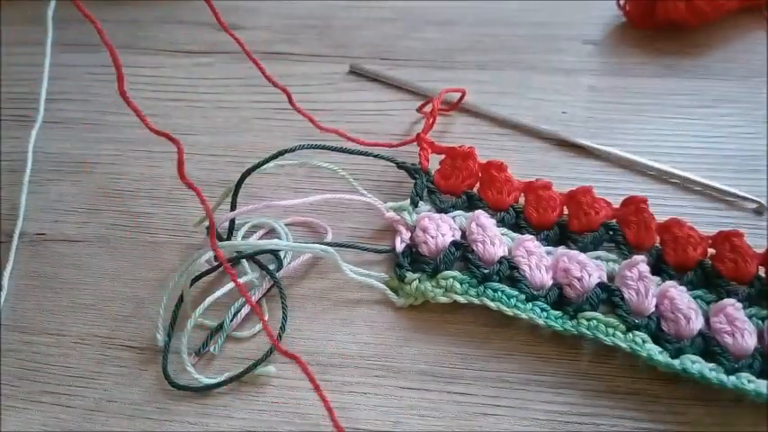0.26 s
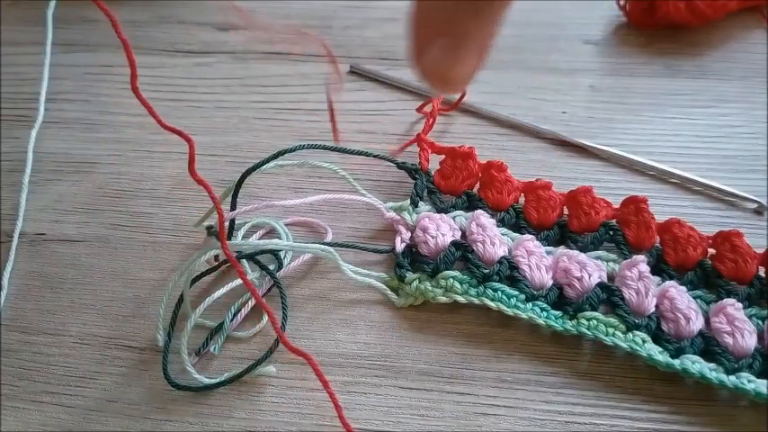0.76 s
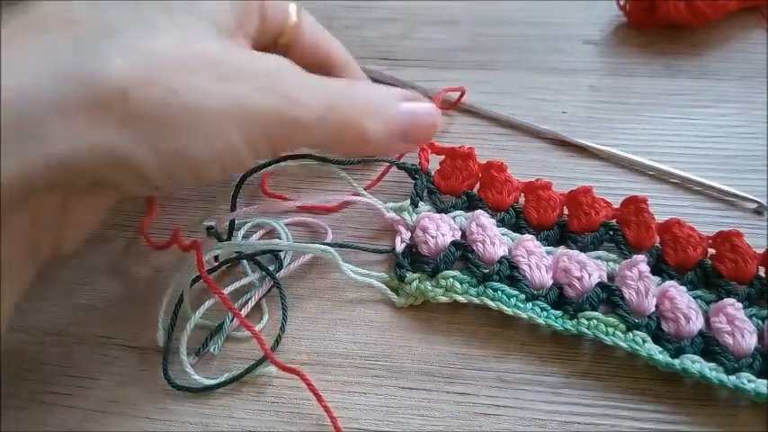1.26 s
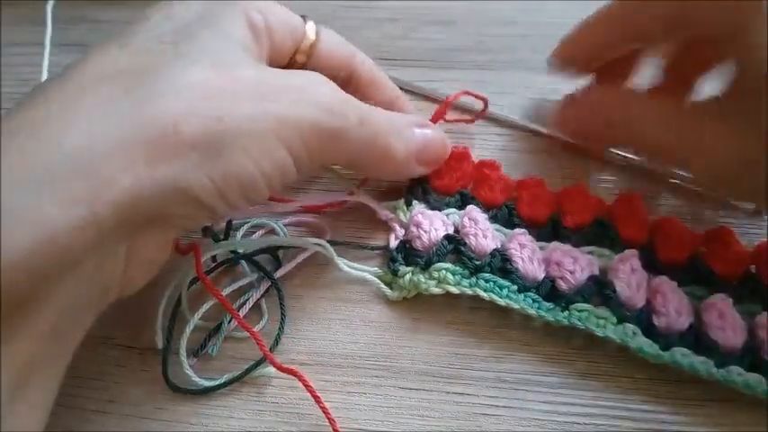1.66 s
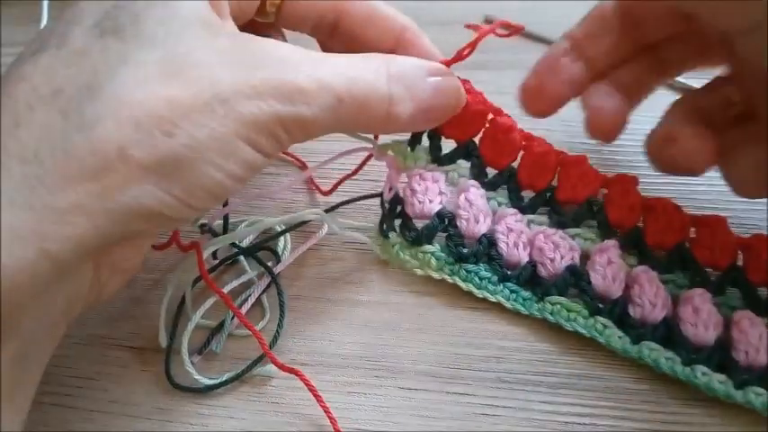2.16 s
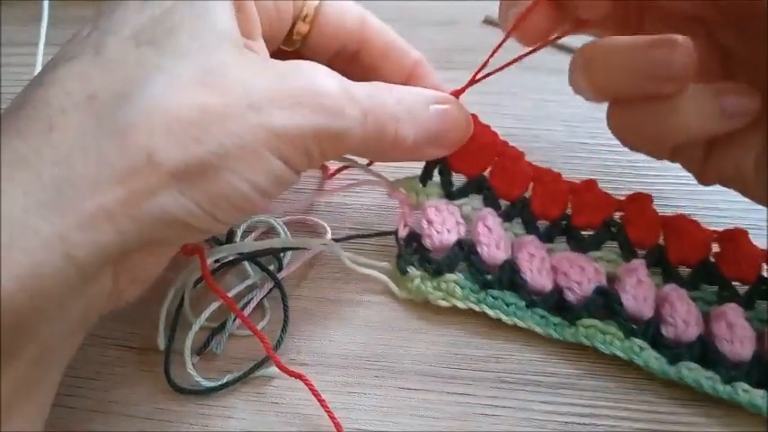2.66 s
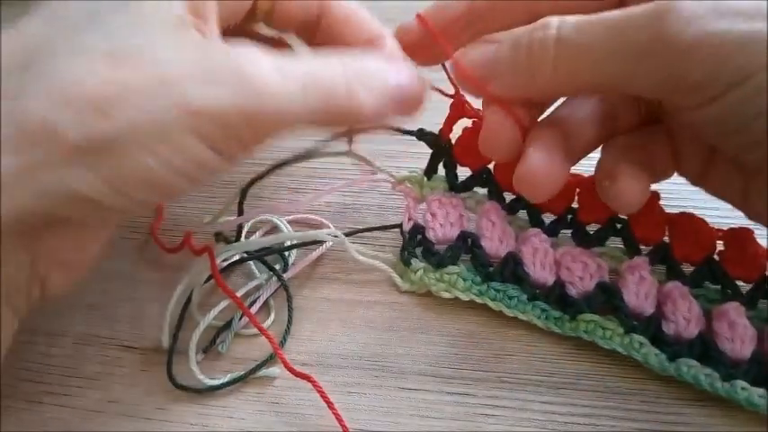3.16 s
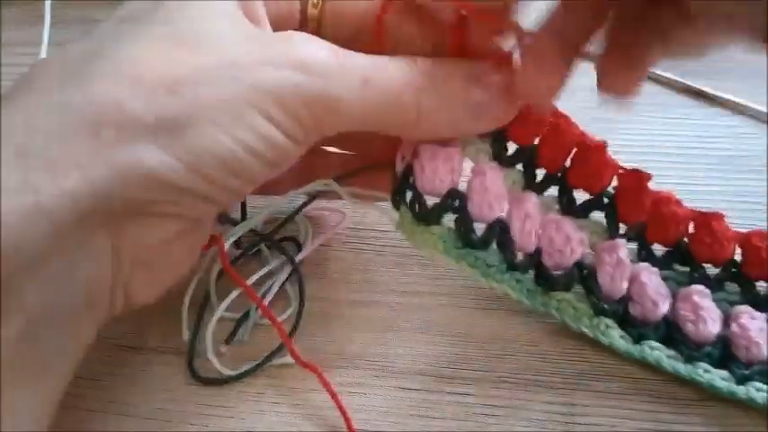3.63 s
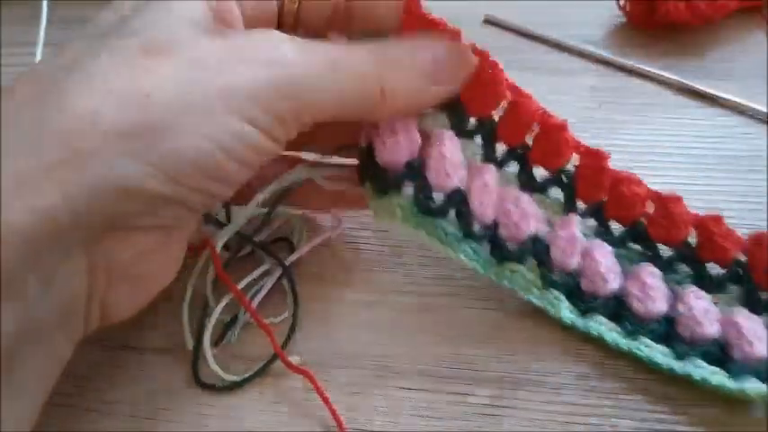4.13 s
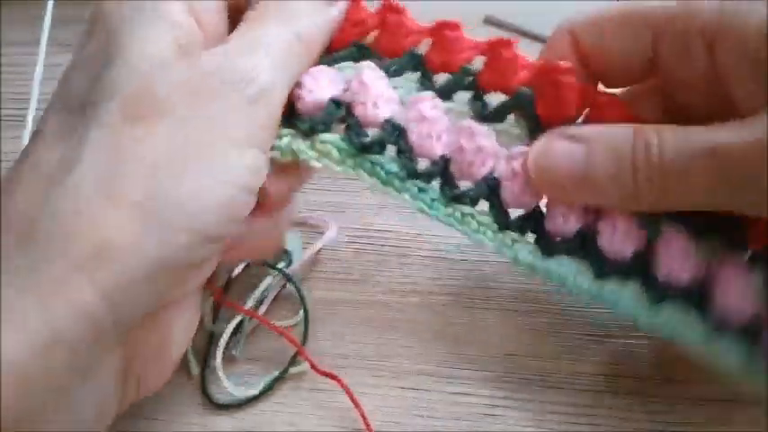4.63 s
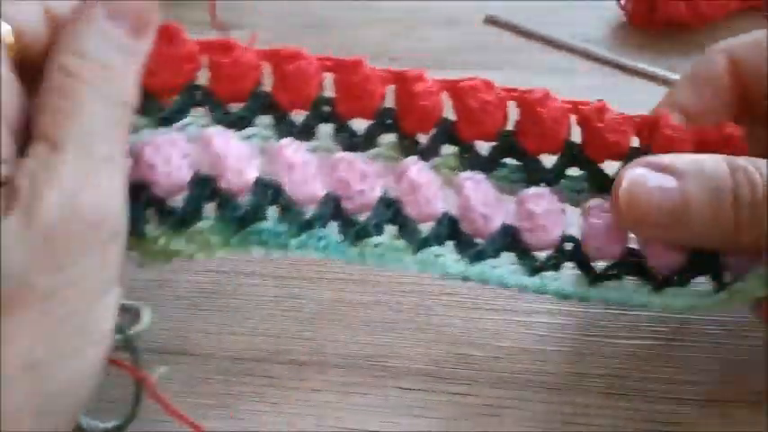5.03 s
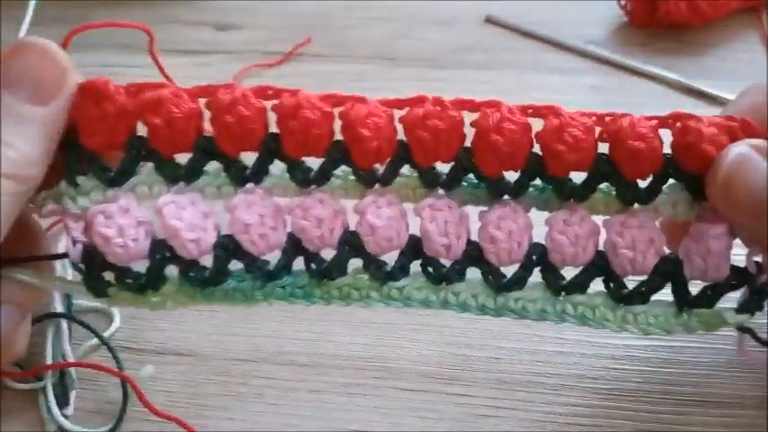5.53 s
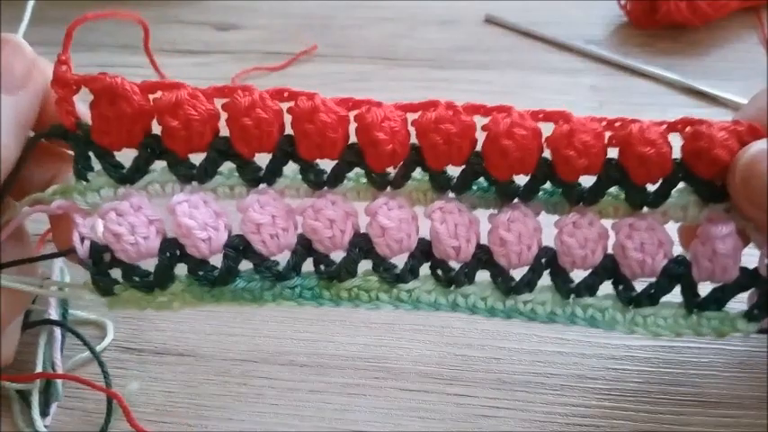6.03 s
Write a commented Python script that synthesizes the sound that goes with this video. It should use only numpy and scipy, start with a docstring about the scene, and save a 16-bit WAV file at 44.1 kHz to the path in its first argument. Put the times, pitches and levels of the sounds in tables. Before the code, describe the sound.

Close stereo phone microphones on handiwork at a wooden table, with faint room tone. Light metal scraping and small knocks, a thin blade squeak, then a crisp dry snip. Scissors land hard on the wood, ringing brightly and rattling to rest; a slender hook slides away with a high hiss. The rest is very quiet: fibres rustling, hands and knitted cotton brushing the tabletop, one dull bump near the end.

```python
"""Crochet work on a wooden table in a small quiet room, close to a phone with two microphone ports.
Over faint room tone, steel scissors are dragged off the table, open with a thin squeak and snip a thread.
After a first faint rustle of yarn they are dropped: a clank and a few quickening bounces.
A metal hook scrapes and sings as it is picked up; yarn then rustles softly through the fingers,
the crocheted strip drags over the wood, hands brush the table and one of them bumps it."""
import sys
import numpy as np
from scipy import signal
from scipy.fft import rfft, irfft
from scipy.io import wavfile

SR = 44100
rng = np.random.default_rng(int(sys.argv[2]) if len(sys.argv) > 2 else 0)


def transcribe(u):
    """Save the signal u as a 16-bit wav file named by the first command-line argument.

    u: samples, shape (n,) or (channels, n), limited to [-1, 1]; the rate is SR.
    q: integer samples, one column per channel.
    """
    v = np.clip(np.atleast_2d(u).T, -1, 1)
    q = np.round(v * 32767).astype(np.int16)
    wavfile.write(sys.argv[1], SR, q)


N = 277168
TIME = np.arange(N) / SR  # s
RING_TIME = TIME[:SR * 3 // 4]  # s, the span of every ring and echo

# All levels are relative. Spectra list [f/Hz, density/dB per Hz]; L-R/dB is left minus right port.
# Faint tone of the room: spectrum
ROOM_SPECTRUM = [(20, 0.5), (30, -13.5), (45, -11), (120, -20.5), (200, -17.5), (320, -21.5), (540, -26.5),
                 (1000, -31), (2700, -37.5), (5200, -44), (11000, -42.5), (15000, -44.5)]
ROOM_DB = -65.5
# Metal sliding on wood, first the scissors, then the hook:
# [middle t/s, length/s, scrape level/dB, hiss level/dB, low rumble level/dB, resonance of the spot f/Hz]
SLIDES = [(0.01, 0.13, -70, -58, -60.5, 1950), (0.07, 0.13, -66, -57, -70, 1120),
          (0.153, 0.15, -60, -50.5, -65.5, 1960), (1.536, 0.1, -60.5, -53.5, -64, 2100),
          (1.602, 0.07, -64, -49, -60, 2070), (1.682, 0.16, -47, -60, -51, 2210),
          (1.808, 0.17, -59.5, -61, -64, 1400), (2.028, 0.13, -51, -44.5, -70, 2290),
          (2.114, 0.092, -53.5, -48, -72, 1050), (2.161, 0.13, -57, -49, -71, 1430),
          (2.224, 0.24, -55, -44.5, -77, 2060)]
# Scrape of metal, also brushing cotton, on wood: spectrum
SCRAPE_SPECTRUM = [(150, -15.5), (380, -7.5), (730, -13.5), (950, -4.5), (1400, -5.5), (1750, -8.5),
                   (2050, -6), (2800, -9), (4000, -13), (5500, -27), (10000, -28.5), (15000, -41.5)]
# Hiss of metal over the fine grain: spectrum
HISS_SPECTRUM = [(1500, -19), (3000, -0.5), (4500, -2.5), (6200, -3.5), (8000, -2.5), (9500, 0), (10800, 0),
                 (11600, -17), (13000, -18.5), (15000, -23.5)]
# A stroke's speed follows one arch; its gain is speed to this power
SPEED_POWER = 1.74
# Blows on the table top:
# [t/s, wooden knock level/dB, low boom level/dB, hollow thud level/dB, contact tick level/dB]
KNOCKS = [(0.071, -32, -47, -40, -38), (0.118, -30, -30, -35.5, -37), (0.131, -30, -38, -33, -43),
          (0.147, -24.5, -33, -31.5, -34), (0.162, -28, -26.5, -52, -37), (0.173, -32, -37.5, -25, -35),
          (0.191, -35, -31, -34, -40), (1.4968, -19, -30, -25.5, -37), (1.533, -38, -46, -31, -43),
          (1.5925, -16, -19, -19, -22.5), (1.6243, -16, -30, -34, -42), (1.6405, -7.5, -15.5, -35, -11),
          (1.7003, -8, -14, -22, -24), (1.7432, -11, -45, -25, -26), (1.7745, -16.5, -37, -25, -34),
          (1.798, -28, -34, -25.5, -46), (1.8345, -34.5, -29, -31, -57), (1.860, -42, -44, -32.5, -55),
          (1.9595, -35.5, -42, -28, -46), (2.0065, -23, -37, -33, -46), (2.0325, -19.5, -57, -28, -47),
          (2.043, -25, -50, -28, -31), (2.049, -22, -49, -36, -36), (2.085, -32, -41, -57, -55),
          (2.124, -21.5, -56, -50, -28.5), (2.174, -27.5, -57, -40, -44), (2.205, -44, -53, -35.5, -28.5),
          (5.7455, -46, -31, -28, -58)]
# Ringing of the table top, main, low and middle modes: [f/Hz, level/dB, t60/s]
TABLE_MODES = [(928, -7, .28), (1047, -5, .24), (1170, -8, .2), (1420, -9, .18), (1448, -8, .2),
               (1944, -4, .14), (1966, 0, .19), (2050, -4, .13), (2149, -6, .18)]
TABLE_LOW_MODES = [(112, -17, .2), (159, 0, .26), (172, -7, .12), (215, -6, .24), (254, -10, .18)]
TABLE_MID_MODES = [(335, -4, .1), (404, 0, .12), (490, -3, .08), (580, -6, .08)]
# Knock, hollow thud and contact tick of the wood: spectra
KNOCK_SPECTRUM = [(150, -20), (330, -3), (520, 0.5), (750, -7), (1100, 8), (1450, 2), (1730, -10.5),
                  (2020, 9), (2400, -11.5), (3100, -7), (4000, -21), (8000, -34), (15000, -53.5)]
THUD_SPECTRUM = [(40, -38), (110, -17), (160, -5), (240, -4), (370, 0), (510, -3), (650, -12), (900, -14),
                 (2500, -45)]
TICK_SPECTRUM = [(1500, -21.5), (4000, -13.5), (6000, -3), (8000, -7.5), (9500, -2.5), (11300, -1.5),
                 (13000, -13), (15000, -14)]
# Blades rubbing on each other, first opening, then shearing through the thread:
# [middle t/s, length/s, edge level/dB, handle level/dB, L-R/dB]
BLADE_STROKES = [(0.318, 0.12, -68, -85, 3), (0.424, 0.1, -58, -69, 3), (0.922, 0.05, -69, -66, 4),
                 (0.9563, 0.033, -42.5, -52, 1)]
# Sharp catches of the blades and of taut thread: [t/s, level/dB]
SNAPS = [(0.332, -37), (0.391, -55), (0.397, -34.5), (0.408, -33.5), (0.9582, -15.5), (0.9593, -2),
         (1.250, -41), (4.503, -47)]
# Blades and handles of scissors held in the hand: [f/Hz, level/dB, t60/s, L-R/dB]
BLADE_MODES = [(4980, -25, .004, -7.5), (6400, -24.5, .006, 1.5), (7200, -18.5, 0.0025, -5),
               (8330, -12.5, .0025, 1), (9300, -3, .002, -5), (10600, -8, 0.009, 5)]
HANDLE_MODES = [(1040, -31, 0.012, -2), (1430, -19.5, 0.0014, -3.5), (2350, -18.5, .006, 7),
                (3560, -34, 0.0034, 0.5)]
# Edge grinding on edge: spectrum
EDGE_SPECTRUM = [(600, -23), (1100, -11), (3000, -9), (5000, -8.5), (7300, -6.5), (9500, -0.5),
                 (11200, -0.5), (12800, -13.5), (15000, -13.5)]
SQUEAK_SLOW_HZ, SQUEAK_FAST_HZ, SNIP_T60_S = 8370, 11800, 0.36
# Yarn drawn through the fingers: [middle t/s, length/s, level/dB, L-R/dB]
YARN_PULLS = [(1.243, 0.1, -78, -3), (1.298, 0.069, -73.5, 6), (1.42, 0.17, -80, 4),
              (2.684, 0.27, -76.5, -1.5), (2.831, 0.17, -75, -1.5), (2.971, 0.13, -81, 3),
              (3.133, 0.11, -72.5, 4), (3.239, 0.14, -73, -2.5), (3.516, 0.6, -80.5, 0),
              (3.67, 0.033, -75.5, -2.5), (3.852, 0.48, -77, -2), (4.11, 0.27, -73, 0),
              (4.145, 0.071, -69, -2), (4.251, 0.065, -71.5, -0.5)]
# Stitches rustling as the crocheted strip is dragged along and spread out, a curve: [t/s, level/dB]
STRIP_DRAG = [(4.35, -94), (4.416, -71.5), (4.564, -76), (4.806, -68.5), (4.816, -72), (5.282, -68.5),
              (5.402, -76.5), (5.536, -71), (5.62, -76.5), (5.665, -72), (5.798, -85), (5.906, -71.5),
              (6.06, -91.5)]
DRAG_PAN_DB = -1  # L-R
# Yarn on skin and on itself: spectrum
YARN_SPECTRUM = [(150, -13), (320, -3.5), (700, -13.5), (2000, -11.5), (3500, -7.5), (6500, -5.5),
                 (9300, 3), (11000, 2), (12300, -10.5), (15000, -9)]
# The dropped scissors land, then ring again faintly at two bounces: [t/s, level/dB]
CLANKS = [(1.6402, 1), (1.746, -26), (1.775, -40)]
# Ringing of the steel scissors: [f/Hz, level/dB, t60/s]
STEEL_MODES = [(1067, -8, .3), (2149, -7, .27), (2235, -12, .25), (3170, -14, .2), (4576, -15, .37),
               (4865, -7, .3), (4998, -12, .3), (5262, -5, .33), (5502, -12, .36), (5830, -13, .28),
               (6219, -3, .32), (6299, -5, .33), (6480, -8, .25), (6810, -11, .22), (7093, -3, .33),
               (7138, -6, .2), (7535, -3, .3), (7596, -6, .28), (7628, 0, .35), (7644, -7, .34),
               (7800, -12, .3), (7848, -3, .3), (7978, -5, .35), (8122, -6, .24), (8570, -10, .3),
               (8899, -9, .31), (8985, -8, .22), (9182, -6, .26), (9318, -9, .27), (9378, -9, .22),
               (9900, -11, .26), (10250, -13, .28), (10672, -4, .16), (10711, -4, .2), (10810, -9, .28),
               (10960, -11, .33), (11680, -16, .24)]
# Crash of the scissors on the table: spectrum
CLANK_SPECTRUM = [(2200, -29), (3200, -26), (4350, -30), (4700, -5.5), (5350, -4), (5750, -14.5), (6250, 0),
                  (7400, 0), (9000, -4.5), (11200, -7), (12500, -8), (15000, -32)]
# The hook's shaft singing as it slides: [middle t/s, length/s, level/dB]
SONGS = [(2.03, 0.095, -65), (2.15, 0.15, -68), (2.24, 0.18, -54.5), (2.34, 0.14, -84.5)]
# Partials of the hook: [f/Hz, level/dB, L-R/dB]
HOOK_PARTIALS = [(5943, -15, -2), (7989, -14, -1), (8355, -10, -4), (10670, 0.5, 12), (12070, -6, 9),
                 (14180, -13, 9), (15289, -8.5, 11)]
# Hands and the strip rubbing on the wood: [middle t/s, length/s, dull rub level/dB, dry brush level/dB]
RUBS = [(3.3, 1.0, -73.5, -94.5), (4.13, 0.14, -80.5, -83.5), (4.75, 0.66, -77, -78.5),
        (5.2, 0.64, -70.5, -73.5), (5.6, 0.66, -68.5, -73.5), (5.81, 0.22, -70, -88)]
# Skin rubbing on wood: spectrum
RUB_SPECTRUM = [(100, -9), (220, -5), (320, 4.5), (450, -7), (800, -18), (2000, -38)]
ROOM_T60_S, ROOM_WET_DB = 0.43, -12
# Treble response of the left and the right microphone port: each [f/Hz, level/dB]
PORT_RESPONSES = [
    [(4000, 0), (9000, 1), (11500, 4.5), (14000, -3)],
    [(4000, 0.5), (9000, 3.5), (11500, -1.5), (14000, -4)],
]
TOP_HZ = 15700


def undb(db):
    """Decibels to gain."""
    return 10 ** (np.asarray(db) / 20)


def unit(x):
    """Scale each channel of a response to unit energy."""
    return x / np.sqrt(np.sum(x ** 2, axis=-1, keepdims=True))


def fader(rows):
    """Gain from a (s, dB) curve, silent outside it."""
    return undb(np.interp(TIME, *np.transpose(rows), left=-np.inf, right=-np.inf))


def through(x, response):
    """Pass a sound through an impulse response."""
    return signal.fftconvolve(np.atleast_2d(x), np.atleast_2d(response), axes=-1)[:, :np.shape(x)[-1]]


def response(points, size=4096):
    """Causal minimum-phase impulse response of a (Hz, dB) spectrum, by folding its cepstrum."""
    hz, db = np.transpose(points)
    bins_hz = np.arange(size // 2 + 1) * SR / size
    levels = np.interp(np.log(bins_hz + 1), np.log(hz), db)
    cepstrum = irfft(np.log(undb(levels)))
    fold = np.r_[1, np.full(size // 2 - 1, 2), np.zeros(size // 2)]
    return irfft(np.exp(rfft(cepstrum * fold)))


def two_ports(x, apart_hz=580):
    """Long waves reach both ports alike; short ones arrive unrelated."""
    highpass = signal.butter(2, apart_hz, "high", fs=SR, output="sos")
    side = signal.sosfilt(highpass, x[1])
    return np.array([x[0] + side, x[0] - side]) / np.sqrt(2)


def panned(left_db):
    """Gains of the two ports for a level difference, left minus right."""
    return undb(np.array([[left_db], [-left_db]]) / 2)


def fade(t60):
    """Exponential decay, 60 dB down after t60 seconds."""
    return np.exp(-np.log(1000) * RING_TIME / t60)


def burst(colour, t60):
    """Stereo response of many crowded modes that die together."""
    noise = two_ports(rng.standard_normal((2, len(RING_TIME))))
    return unit(through(noise * fade(t60), response(colour)))


def ring(modes, apart_hz=1200):
    """Stereo response of distinct modes; up to apart_hz their phase differs more between ports."""
    signs = rng.choice([-1, 1], len(modes))[:, None, None]
    lags = signs * np.array([[1], [-1]]) * np.pi / 4
    starts = rng.choice([0, np.pi], len(modes))
    total = 0
    for (hz, db, t60), start, lag in zip(modes, starts, lags):
        phase = 2 * np.pi * hz * RING_TIME + start + lag * min(hz / apart_hz, 1)
        total = total + undb(db) * fade(t60) * np.sin(phase)
    return unit(total)


def damped(modes, swell_s=0.00033):
    """Stereo response of hand-damped modes that swell and die within milliseconds."""
    swelling = 1 - np.exp(-RING_TIME / swell_s)
    port_phase = np.array([[0], [np.pi / 2]])
    total = 0
    for hz, db, t60, pan_db in modes:
        tone = np.sin(2 * np.pi * hz * RING_TIME + port_phase)
        total = total + undb(db) * panned(pan_db) * unit(swelling * fade(t60) * tone)
    return total


def crowd(colour, t60, count=280):
    """Stereo response of many separate weak modes, scattered under a spectrum."""
    hz, db = np.transpose(colour)
    places = (np.arange(count) + rng.random(count)) / count
    spots = hz[0] + (hz[-1] - hz[0]) * places
    return ring([(spot, np.interp(spot, hz, db), t60) for spot in spots])


def tinted(points):
    """Unit-energy response of a spectrum, padded to the length of a ring."""
    short = unit(response(points))
    return np.pad(short, (0, len(RING_TIME) - len(short)))


def blows(rows, axis=1):
    """One impulse per row, sized by one dB column."""
    rows, out = np.array(rows), np.zeros(N)
    out[(rows[:, 0] * SR).astype(int)] = undb(rows[:, axis])
    return out


def struck(rows, modes, axis=1, spot_db=3):
    """Every blow lands on another spot and stirs its own mix of the modes."""
    out = np.zeros((2, N + len(RING_TIME)))
    for row in rows:
        mix = [(hz, db + spot_db * rng.standard_normal(), t60) for hz, db, t60 in modes]
        start = int(row[0] * SR)
        out[:, start:start + len(RING_TIME)] += undb(row[axis]) * ring(mix)
    return out[:, :N]


def walk(rate, count=4096):
    """Random wander between unit-spread points, rate of them a second."""
    knots = rng.standard_normal(count)
    return np.interp(TIME * rate, np.arange(len(knots)), knots)


def friction(rate, spread_db, flicker_db):
    """Dense tiny slips, rate a second, of uneven size that come in clusters; rms near 1 at each port."""
    happens = rng.random(N) < rate / SR
    sizes = happens * undb(spread_db * np.minimum(rng.exponential(size=N), np.pi))
    slips = sizes * undb(flicker_db * walk(70)) * rng.standard_normal((2, N))
    return two_ports(slips / slips.std())


def stroke(middle, length):
    """Gain of one sliding stroke that speeds up and slows down again."""
    gain, moving = np.zeros(N), np.abs(TIME - middle) < length / 2
    speed = np.abs(np.cos(np.pi * (TIME[moving] - middle) / length))
    gain[moving] = speed ** SPEED_POWER
    return gain


def strokes(rows, axis=2):
    """Gain of a series of strokes, sized by one dB column."""
    return sum(undb(row[axis]) * stroke(row[0], row[1]) for row in rows)


def room_tone():
    """Faint steady rumble and hiss: shaped noise, nearly unrelated at the two ports."""
    noise = two_ports(rng.standard_normal((2, N)), apart_hz=16.0)
    return undb(ROOM_DB) * through(noise, unit(response(ROOM_SPECTRUM)))


def table_slides(board_db=-16, spot_db=-5):
    """Metal stutters over the wood grain and shakes the board, which answers differently at each spot."""
    scrape_gain, hiss_gain, rumble_gain = (strokes(SLIDES, axis=k + 2) for k in range(3))
    ridges = undb(3.2 * walk(220) - .8)
    slips = ridges * friction(rate=3000, spread_db=.6, flicker_db=.6)
    scraped_board = tinted(SCRAPE_SPECTRUM) + undb(board_db) * ring(TABLE_MODES)
    scrape = through(slips * scrape_gain, scraped_board)
    spots = 0
    for middle, length, db, _, _, hz in SLIDES:
        answer = damped([(hz, spot_db, .025, 0)])[:, :SR // 40]
        spots = spots + through(slips * undb(db) * stroke(middle, length), answer)
    low_board = undb(2.5) * ring(TABLE_LOW_MODES) + undb(-3) * burst(THUD_SPECTRUM, t60=0.077)
    rumble = through(slips * rumble_gain, low_board)
    grain = ridges * friction(rate=9000, spread_db=1.5, flicker_db=.6)
    hiss = through(grain * hiss_gain, unit(response(HISS_SPECTRUM)))
    return scrape + spots + rumble + undb(-12.5) * hiss


def table_knocks(rise=0.0029, board_db=-11):
    """Each contact ticks; bending waves take a moment to fill the board, which knocks and booms on."""
    knocks, booms, thuds, ticks = (blows(KNOCKS, axis=k + 1) for k in range(4))
    filling = 1 - np.exp(-RING_TIME / rise)  # rise in s
    # the board's crowded modes blur into a short crack and a faint aftersound
    crack = unit(fade(t60=0.029) * filling)
    after = undb(-11) * unit(fade(t60=.22) * filling)
    energy = through(knocks ** 2, crack ** 2 + after ** 2)
    noise = two_ports(rng.standard_normal((2, N)))
    knock = through(noise * np.sqrt(np.abs(energy)), unit(response(KNOCK_SPECTRUM)))
    ringing = undb(board_db) * struck(KNOCKS, TABLE_MODES)
    boom = through(booms, ring(TABLE_LOW_MODES))
    hollow = undb(-2.5) * burst(THUD_SPECTRUM, t60=0.18) + undb(-3.5) * ring(TABLE_MID_MODES)
    thud = through(thuds, hollow)
    tick = through(ticks, burst(TICK_SPECTRUM, t60=0.02))
    return knock + ringing + boom + thud + tick


def blade_squeak(middle, length):
    """A thin, rough tone of edge on edge that rises and falls with the speed of the stroke."""
    hz = SQUEAK_SLOW_HZ + (SQUEAK_FAST_HZ - SQUEAK_SLOW_HZ) * np.sqrt(stroke(middle, length))
    rough = through(rng.standard_normal((2, N)), unit(fade(t60=.008)[:SR // 100]))
    return np.sqrt(2) * rough * np.sin(2 * np.pi * np.cumsum(hz) / SR)


def scissors_snip(squeak_db=-3, crack_db=-7.5, echo_db=-16):
    """Blades grind along each other and snap shut; the handles add a short, lower tock."""
    slips = friction(rate=8000, spread_db=1.8, flicker_db=1.2)
    rubbing = squeak = 0
    for middle, length, db, _, pan_db in BLADE_STROKES:
        gain = undb(db) * panned(pan_db) * stroke(middle, length)
        rubbing = rubbing + gain
        squeak = squeak + gain * blade_squeak(middle, length)
    edges = through(slips * rubbing, tinted(EDGE_SPECTRUM))
    handle_hum = through(slips * strokes(BLADE_STROKES, axis=3), unit(damped(HANDLE_MODES[:1])))
    grind = edges + handle_hum + undb(squeak_db) * squeak
    catches = blows(SNAPS)
    crack = undb(crack_db) * burst([(600, -30), (1300, 0), (12500, 0), (15000, -3)], t60=.004)
    snap = through(np.array([catches, catches]), damped(BLADE_MODES) + damped(HANDLE_MODES) + crack)
    # the blades chatter just after they meet
    chatter_gain = fade(t60=.02) * (1 - np.exp(-RING_TIME / .001))
    rattling = undb(-13) * unit(rng.standard_normal((2, len(RING_TIME))) * chatter_gain)
    # the walls return what the blades send out in all directions, an even wash
    wash = unit(rng.standard_normal((2, len(RING_TIME))) * fade(SNIP_T60_S))
    echo = through(catches, burst(EDGE_SPECTRUM, t60=SNIP_T60_S)) + through(grind, wash)
    return grind + snap + through(snap, rattling) + undb(echo_db) * echo


def yarn_rustle(pull_db=0.5, drag_db=1.5):
    """Countless fibres slip over skin and over each other; now and then one catches and lets go."""
    fibres = friction(rate=24000, spread_db=.8, flicker_db=1.4)
    catches = friction(rate=350, spread_db=2.5, flicker_db=2)
    slips = fibres + undb(-8) * catches
    pulls = sum(undb(db) * panned(pan_db) * stroke(middle, length)
                for middle, length, db, pan_db in YARN_PULLS)
    drag = undb(drag_db) * panned(DRAG_PAN_DB) * fader(STRIP_DRAG)
    return through(slips * (undb(pull_db) * pulls + drag), unit(response(YARN_SPECTRUM)))


def scissors_clank(crash_db=-2, ring_db=0):
    """A bright crash on the table thins out into steel tones, stirred again faintly by two of the bounces."""
    # while pressed on the wood the tones die fast and lie closer in level
    pressed = ring([(hz, db / 2, .06) for hz, db, _ in STEEL_MODES])
    crash = unit(burst(CLANK_SPECTRUM, t60=0.16) + pressed)
    shimmer = crowd(CLANK_SPECTRUM, t60=.27) + burst(CLANK_SPECTRUM, t60=.29)
    ringing = undb(-6) * shimmer + undb(-4.5) * ring(STEEL_MODES)
    return through(blows(CLANKS), undb(crash_db) * crash + undb(ring_db) * ringing)


def hook_song(flutter_db=2.5):
    """Friction keeps the thin shaft's high modes singing, a little unsteadily."""
    waver = .55  # rad
    port_phase = np.array([[0], [np.pi / 2]])
    tones = 0
    for hz, db, pan_db in HOOK_PARTIALS:
        gain = undb(db + flutter_db * walk(160)) * panned(pan_db)
        tones = tones + gain * np.sin(2 * np.pi * hz * TIME + waver * walk(350) + port_phase)
    return tones * strokes(SONGS)


def hands_brushing(rub_db=-1, brush_db=-1):
    """Soft contact with the wood: skin rubs dully, cotton stitches brush over the grain."""
    skin = friction(rate=3800, spread_db=1.5, flicker_db=2)
    rub = through(skin * strokes(RUBS), unit(response(RUB_SPECTRUM)))
    cotton = friction(rate=12000, spread_db=0.5, flicker_db=2.0)
    brush = through(cotton * strokes(RUBS, axis=3), unit(response(SCRAPE_SPECTRUM)))
    return undb(rub_db) * rub + undb(brush_db) * brush


def scene():
    """The handiwork close by with a light tail from the walls; the snip carries its own echo."""
    near = table_slides() + table_knocks() + yarn_rustle()
    near = near + scissors_clank() + hook_song() + hands_brushing()
    wall_spectrum = [(100, 14.0), (1000, -6.5), (5000, 0.0), (10000, -7.0), (15000, -10.0)]
    tail = through(near, burst(wall_spectrum, t60=ROOM_T60_S))
    return room_tone() + near + undb(ROOM_WET_DB) * tail + scissors_snip()


def record(dry):
    """Each microphone port colours the treble its own way; the top is cut steeply."""
    coloured = through(dry, np.array([response(port) for port in PORT_RESPONSES]))
    lowpass = signal.ellip(8, .2, 70, TOP_HZ, fs=SR, output="sos")
    return signal.sosfilt(lowpass, coloured)


dry = scene()
out = record(dry)
transcribe(out)
```